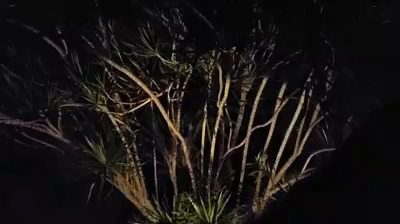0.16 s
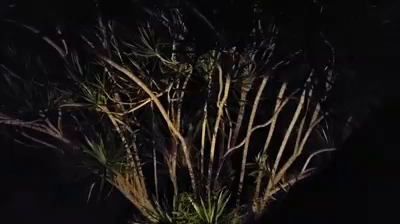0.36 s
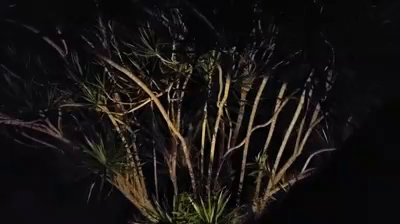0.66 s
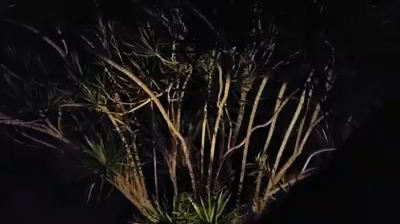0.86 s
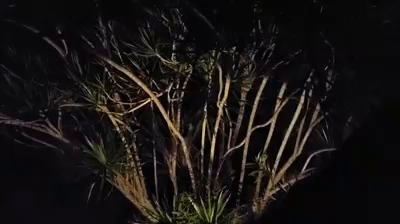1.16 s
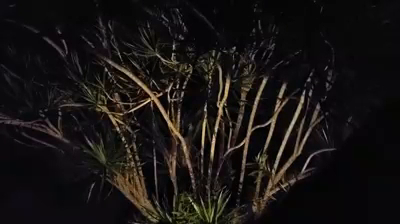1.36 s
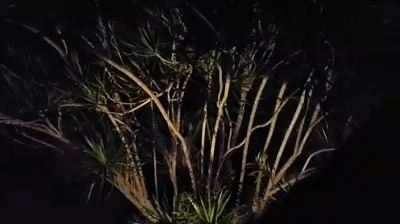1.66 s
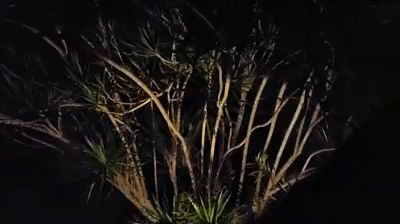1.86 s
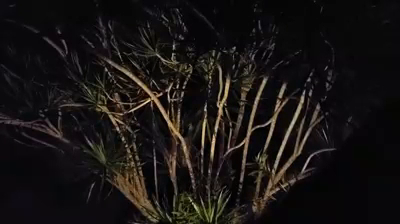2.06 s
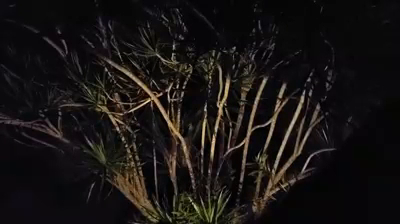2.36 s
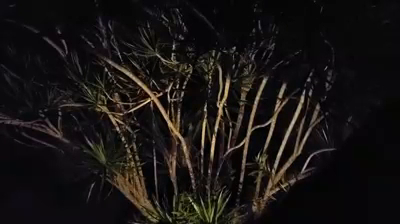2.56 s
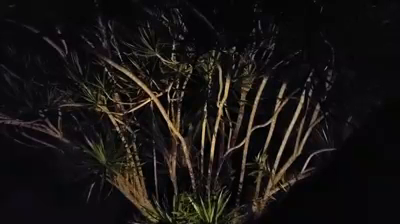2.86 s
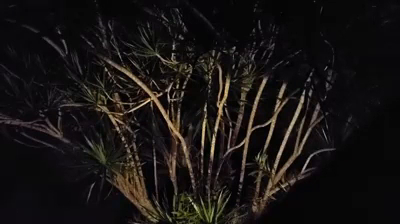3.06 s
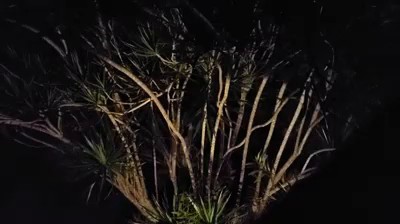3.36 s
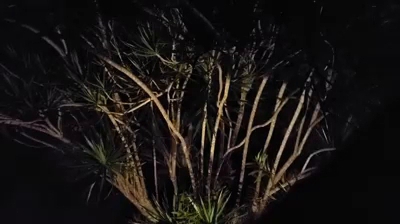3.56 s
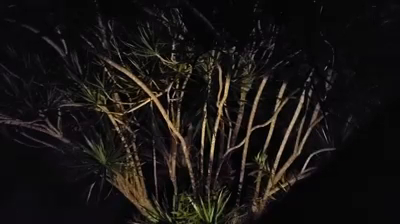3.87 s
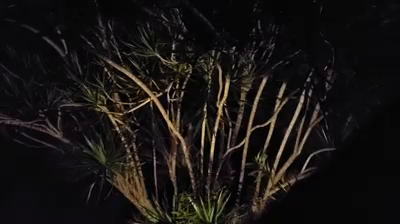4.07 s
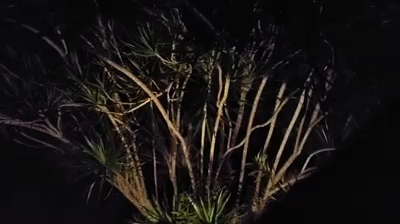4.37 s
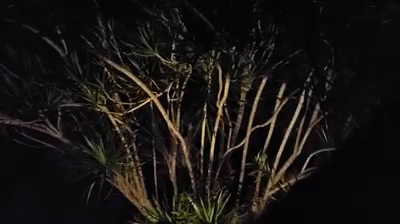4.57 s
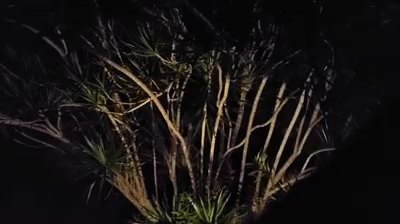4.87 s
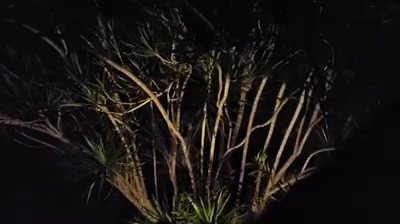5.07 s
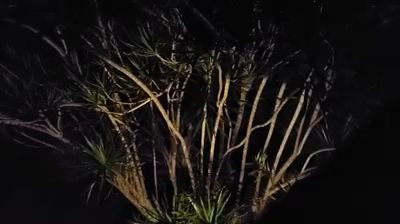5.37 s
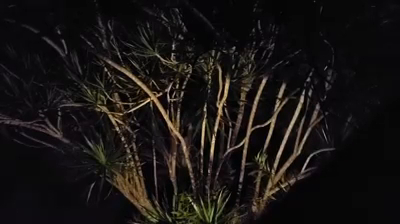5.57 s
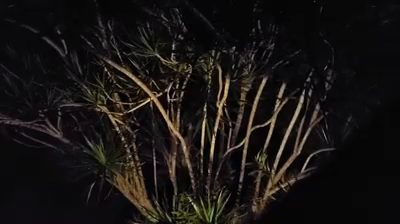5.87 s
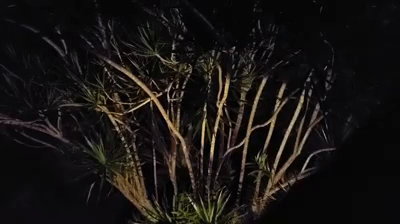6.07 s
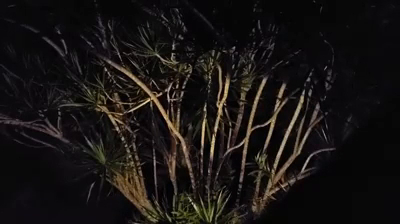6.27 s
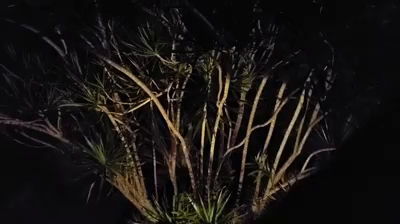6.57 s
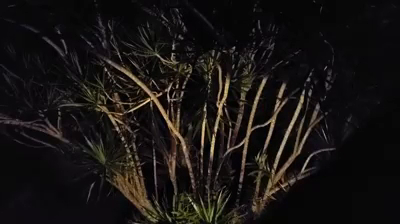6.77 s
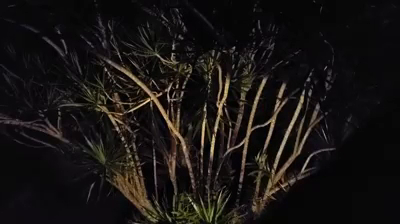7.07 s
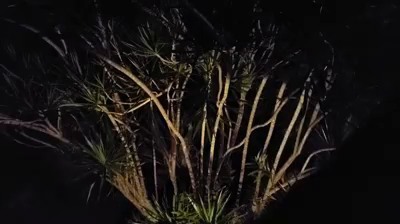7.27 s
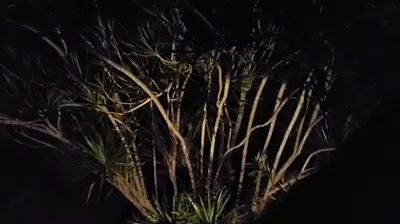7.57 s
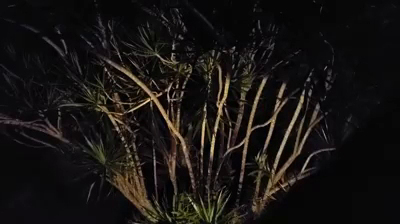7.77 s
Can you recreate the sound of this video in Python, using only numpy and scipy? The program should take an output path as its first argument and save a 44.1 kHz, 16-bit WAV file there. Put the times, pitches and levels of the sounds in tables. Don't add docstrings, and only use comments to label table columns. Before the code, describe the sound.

Crowded frog chorus outdoors among plants: short falling chirps, quick rising peeps and long thin whistles, over blurred insects, low air and a faint wavering machine hum. One close frog calls two-note phrases early, midway and late. A high katydid rasp ends before the middle, hollow toad trills pulse later, a cricket rings fast, and handling thumps knock the microphone. The frogs continue to the end.

```python
import sys
import numpy as np
from scipy import signal
from scipy.fft import rfft, irfft, next_fast_len
from scipy.io import wavfile
from scipy.ndimage import uniform_filter1d

SR = 44100
rng = np.random.default_rng(int(sys.argv[2]) if len(sys.argv) > 2 else 0)


def how_loud(loudness_db):
    steps = np.asarray(loudness_db, float) / 20
    return 10 ** steps


def log_audio(samples):
    frames = np.atleast_2d(samples).T
    limited = np.clip(frames, -1, 1)
    pcm = np.round(limited * 32767).astype(np.int16)
    wavfile.write(sys.argv[1], SR, pcm)


N = 349713
T = np.arange(N) / SR


def evened(x):
    return x / np.sqrt(np.mean(x ** 2) + 1e-20)


def read(points, hz):
    f, value = np.transpose(points)
    return np.interp(np.log(hz + 1), np.log(f + 1), value)


def panned(pan_db):
    return how_loud([[pan_db / 2], [-pan_db / 2]])


def add(mix, s, sound, pan_db):
    part = mix[:, max(round(s * SR), 0):][:, :len(sound)]
    part += sound[:part.shape[1]] * panned(pan_db)


def drift(count, hz):
    at = np.arange(0, count + 32, 32)
    rates = hz * rng.uniform(0.2024, 1, 6)
    slow = sum(np.sin(2 * np.pi * (rate * at / SR + rng.random())) for rate in rates)
    return np.interp(np.arange(count), at, slow) / np.sqrt(3)


def tone(hz):
    return np.sqrt(2) * np.sin(2 * np.pi * (np.cumsum(hz) / SR + rng.random()))


def foliage(x, t60):
    taps = np.zeros((2, SR))
    at = np.arange(200, SR - 40, 40) + rng.integers(0, 40, (2, (SR - 201) // 40))
    np.put_along_axis(taps, at, rng.choice([-1., 1.], at.shape), 1)
    taps *= how_loud(-60 * np.arange(SR) / SR / t60)
    taps /= np.linalg.norm(taps[0])
    size = next_fast_len(N + SR, real=True)
    return irfft(rfft(x, size) * rfft(taps, size), size)[:, :N]


# f/Hz, left-right likeness [0-1]
LIKENESS = [(60, 1), (700, 0.75), (1400, 0.084), (4000, 0.34), (9000, 0.055)]


def hiss(spectrum, patchy_db, pan_db):
    frames, hz = N // 256 + 5, np.fft.rfftfreq(1024, 1 / SR)
    a, b, c, d, patches = rng.standard_normal((frames, 513, 5)).T
    patches = uniform_filter1d(patches, size=6, axis=0)
    patches = evened(uniform_filter1d(patches, size=20, axis=1))
    same = np.clip(read(LIKENESS, hz), -1, 1)[:, None]
    left = a + 1j * b
    right = same * left + np.sqrt(1 - same ** 2) * (c + 1j * d)
    z = np.array([left, right]) * how_loud(read(spectrum, hz)[:, None] + patchy_db * patches)
    noise = signal.istft(z, nperseg=1024, noverlap=768)[1][:, :N]
    return evened(noise) * panned(pan_db)


# f/Hz, level/dB per Hz
AIR_SPECTRUM = [(20, -35), (40, -32), (75, -6.5), (300, -15.5), (750, -22), (1250, -24.5), (2800, -5.5),
                (3400, -20.5), (4500, -52)]


def night_air():
    return how_loud(-47.5) * hiss(AIR_SPECTRUM, patchy_db=0.5, pan_db=-2.5)


# f/Hz, level/dB per Hz
INSECT_SPECTRUM = [(3300, -36), (3800, -26), (4200, -7), (5370, -4.5), (6250, -8), (6650, -26), (7450, -17),
                   (7900, -32.5), (9600, -38.5), (11200, -31.5), (13600, -35.5), (14300, -44), (15900, -38)]


def distant_insects():
    return how_loud(-42.5) * hiss(INSECT_SPECTRUM, patchy_db=2.5, pan_db=-1.5)


# t/s, low order level/dB, middle order level/dB, low order f/Hz
MACHINE_HUM = [
    (0, -50, -52.5, 58),
    (.6, -75, -82, 58),
    (.85, -52, -71, 58),
    (1.5, -55.5, -64, 58),
    (1.8, -65.5, -71.5, 58),
    (3.4, -55.5, -64, 64),
    (4.2, -54, -90, 65),
    (4.6, -53, -55, 67),
    (7.9, -58.5, -68.5, 73),
]
# middle t/s, half length/s, level/dB
MACHINE_LOAD = [
    (3, 0.54, -63.5),
    (3.492, 0.074, -55.5),
    (3.82, 0.11, -59.5),
    (6.452, 0.49, -56.5),
]


def machinery():
    s, low_db, mid_db, low_hz = np.transpose(MACHINE_HUM)
    load = sum(how_loud(db) * np.exp(-((T - at) / half) ** 4) for at, half, db in MACHINE_LOAD)
    lines = [(np.interp(T, s, low_hz), how_loud(np.interp(T, s, low_db))),
             (118, how_loud(np.interp(T, s, mid_db))),
             (241, load)]
    hum = np.zeros(N)
    for hz, level in lines:
        waver = how_loud(2.2 * drift(N, hz=15.0))
        hum += level * waver * tone(hz * (1 + 0.0087 * drift(N, hz=9.0)))
    return hum * how_loud([[-3.1], [1.7]])


# t/s, length/s, level/dB, voice f/Hz, strongest throat f/Hz
DOG_YAPS = [
    (3.179, 0.027, -44, 100.5, 570),
    (5.077, 0.017, -44, 100.4, 1056),
    (5.155, 0.043, -44, 114.4, 1106),
    (5.329, 0.085, -39, 99.8, 582),
]


def dog():
    out = np.zeros((2, N))
    for s, length, db, voice_hz, throat_hz in DOG_YAPS:
        t = np.linspace(0, 1, round(length * SR))
        voice = np.zeros(len(t))
        for k in range(3, 13):
            throat = 1 / (1 + ((k * voice_hz - throat_hz) / 55) ** 4)
            voice += throat * tone(k * voice_hz * (1 + 0.02 * np.sin(np.pi * t)))
        add(out, s, how_loud(db) * evened(voice) * np.hanning(len(t)), -1.5)
    middle, side = foliage(out, t60=0.39)
    return out + how_loud(3.0) * (middle + .35 * side * [[1], [-1]])


# t/s, level/dB, f/Hz
TOAD_TRILLS = [
    [(.05, -63, 517), (1.4, -64.5, 487.6)],
    [(2.88, -62, 431), (3.5, -55, 493.7), (4.2, -48, 512), (4.6, -48, 521.6), (5.1, -54, 546),
     (5.8, -57, 518)],
    [(4.3, -52.5, 577), (4.65, -47, 629), (5, -50, 636.5), (5.4, -54, 663), (5.8, -54, 635),
     (6.25, -52, 594), (6.65, -68, 555)],
]
# t/s, beats so far
TOAD_BEATS = [
    [(.07, 0), (1.403, 21)],
    [(2.927, 0), (4.565, 23), (5.85, 41)],
    [(4.333, 0), (5.484, 16), (6.246, 27), (6.66, 33)],
]


def toads():
    out = np.zeros((2, N))
    for trill, beats in zip(TOAD_TRILLS, TOAD_BEATS):
        s, db, hz = np.transpose(trill)
        t = np.arange(s[0], s[-1], 1 / SR)
        beat = np.interp(t, *np.transpose(beats)) % 1
        gate = np.exp(-((beat - .2) / 0.2) ** 2) + 0.58 * np.exp(-((beat - .68) / 0.11) ** 2)
        voice = tone(np.interp(t, s, hz) * (1 + 0.023 * drift(len(t), hz=30.3)))
        voice = voice + 0.1 * voice ** 2
        level = how_loud(np.interp(t, s, db) + 2.8 * drift(len(t), hz=24.95))
        add(out, s[0], level * evened(gate) * voice * signal.windows.tukey(len(t), .08), -1.5)
    return out + how_loud(-12) * foliage(out, t60=.4)


# f/Hz, level/dB per Hz
KATYDID_SPECTRUM = [(4530, -44), (7700, -49), (7910, -42), (8250, -1.5), (11300, 18), (14200, 15.5),
                    (15100, 20.5), (15800, -1)]
# t/s, level/dB
KATYDID_LEVEL = [
    (0, -50.5),
    (1.88, -50),
    (1.92, -57),
    (3.54, -57.5),
    (3.57, -76),
]


def katydid():
    throb_hz = 11.2 + .3 * drift(N, hz=1.5)
    throb = 1 + .15 * np.sin(2 * np.pi * np.cumsum(throb_hz) / SR)
    level = how_loud(np.interp(T, *np.transpose(KATYDID_LEVEL)))
    return level * throb * hiss(KATYDID_SPECTRUM, patchy_db=.6, pan_db=2.5)


# t/s, level/dB, rhythm (x a stroke, . a rest)
CRICKET_PHRASES = [
    (.739, -49, "xx"),
    (1.543, -42, "x..x..xx.xx..xxx.xxxx..x..xx"),
    (3.092, -42, "x..xx.xx...x....xx..xxxxxx.xx..x.xxx..x"),
    (4.326, -42.5, "xxx..xx..xx..xxxxxx.x"),
    (5.033, -41.5, "xx..x.xx.xxxx.....x..x"),
    (5.795, -40, "xx..xxxx.xxxxxxxx"),
    (6.476, -39.5, "x..xxx..xx..xxxx..xxxxxxxxxxx"),
]


def cricket():
    strokes_per_s = 38.3
    out, t = np.zeros((2, N)), np.linspace(0, 1, round(.022 * SR))
    for s, db, rhythm in CRICKET_PHRASES:
        for k, beat in enumerate(rhythm):
            if beat == "x":
                stroke = np.hanning(len(t)) * tone(5540 - 240 * t)
                level = how_loud(db - 0.1 + rng.standard_normal())
                add(out, s + k / strokes_per_s - .011, level * stroke, -5.5)
    return out + how_loud(-6) * foliage(out, t60=.15)


# t/s, peak level/dB, ring f/Hz, t60/s
HOUSING_BUMPS = [
    (.006, -24.5, 236, 0.011),
    (0.2304, -19.5, 272, 0.018),
    (.229, -42, 1060, .015),
    (2.165, -45, 670, 0.033),
    (3.453, -31, 111, 0.06),
    (3.548, -37.5, 89.7, 0.095),
    (3.923, -25, 101.4, 0.055),
    (6.583, -37.5, 89.3, 0.062),
]


def bumps():
    out, t = np.zeros((2, N)), np.arange(0, .08, 1 / SR)
    for s, db, hz, t60 in HOUSING_BUMPS:
        ring = np.sin(2 * np.pi * hz * t * (1 - 1.9 * t)) * np.clip(t * hz * 1.6, 0, 1)
        add(out, s, -how_loud(db + 6.0 - 60 * t / t60) * ring, -3)
    return out


WHISTLE_VOICES = [
    ((3665, 3785, 3, 5), [(.5, .41, -41), (2.49, .41, -41.5), (4.57, .43, -42.5), (7.03, .41, -43)]),
    ((4428, 4400, -7, 0), [(1.96, .3, -41.5), (4.02, .3, -41), (6.19, .31, -41)]),
    ((3960, 3960, 3, 0), [(.57, .32, -38.7), (2.51, .44, -45.9), (5.28, .32, -52.8), (5.96, .08, -43.6), (0, .2, -55), (.93, .28, -55), (7.13, .32, -44.4)]),
    ((3945, 3885, 6, 0), [(.28, .27, -50.4), (3.31, .39, -41.5), (4.85, .37, -50.9), (6.06, .27, -41.4)]),
    ((3449, 3389, 3, 0), [(2.5, .7, -56.6)]),
    ((3700, 3800, 0, 0), [(0, .22, -56), (.93, .27, -51), (2.9, .3, -55), (5.7, .25, -57)]),
]


def whistlers():
    out = np.zeros((2, N))
    far = []
    for s, u, v in rng.random((70, 3)):
        hz = 3830 + 1100 * v ** 2
        far.append(((hz, hz + 10, -2, 0), [(s * N / SR, .3, -55 - 6 * u)]))
    for (hz0, hz1, pan_db, swell_db), tones in WHISTLE_VOICES + far:
        for s, length, db in tones:
            t = np.linspace(0, 1, round(length * SR))
            breath = np.clip(np.minimum(t / .3, (1 - t) * length / .035), 0, 1)
            level = how_loud(db + swell_db * (2 * t - 1) + 2.6 * drift(len(t), hz=18))
            hz = hz0 + (hz1 - hz0) * t + 30 * np.sin(np.pi * t) - 70 * t ** 10
            hz = hz + 6 * drift(len(t), hz=13.84)
            add(out, s, breath * level * tone(hz - 15), pan_db)
    return out + how_loud(-12.5) * foliage(out, t60=0.78)


def note(db, hz0, hz1, length, bend, rise, fall):
    haste = max(hz0 / 2650, .9 if hz1 > 1.1 * hz0 else 1) ** 3
    swell_db = max(db + 37, 0) * (hz1 > hz0)
    span = length * (1.4359 + swell_db / 20) / haste
    t = np.arange(0, span, 1 / SR)
    hz = hz1 + (hz0 - hz1) * np.exp(-t * haste / (1.2 * bend))
    hz = hz * (1 + 0.0071 * drift(len(t), hz=48.5))
    shape = np.clip(t / rise, 0, 1) * np.clip((1 - t / span) * length / fall, 0, 1)
    level = how_loud(db - 0.85 * swell_db * np.exp(-(t / 0.023) ** 2) + 2.7 * drift(len(t), hz=61.3))
    return level * shape * tone(hz)


# t/s, low note level/dB, whistle level/dB
NEAR_FROG = [
    (0.369, -34, -25),
    (3.753, -33, -24.5),
    (6.186, -33, -25),
]
# start f/Hz, goal f/Hz, left-right/dB
NEAR_LOW_NOTE = (1628, 1532, -2.7)
NEAR_WHISTLE = (2516, 3015, 5)
LOW_FROGS = [
    ((1605, 1535, -7.5), [(1.086, -53), (1.756, -47), (2.51, -44), (3.983, -52.5), (4.961, -44.5), (6.805, -51.5), (6.936, -55), (7.303, -46)]),
    ((1480, 1400, -19.5), [(0, -52), (1.74, -47), (2.2, -61), (4.55, -54.5), (6.625, -43)]),
]
SHORT_NOTE_FROGS = [
    ((2010, 1850, -7), [(.411, -42.5), (.938, -38), (1.22, -44.5), (1.824, -37.5), (2.842, -38), (3.652, -36.5), (5.691, -42.5), (6.246, -40), (7.008, -39), (7.311, -38.5), (7.858, -37)]),
    ((1935, 1750, -12.5), [(1.101, -46.5), (2.562, -43), (3.225, -42), (3.879, -40), (5.076, -43.5), (5.791, -47), (6.545, -41)]),
    ((2050, 1825, -11.5), [(.539, -43), (2.666, -46), (3.336, -42), (5.376, -42)]),
                    ((1950, 1980, -12), [(1.824, -44), (1.95, -43.5), (4.03, -48), (4.2, -47), (4.534, -38), (4.653, -51.5), (6.378, -43.5)]),
    ((2110, 2080, -16.5), [(2.658, -45), (3.56, -48), (5.228, -49), (5.843, -49)]),
]
RISING_FROGS = [
    ((2230, 2700, -5), [(.22, -42.5), (2.502, -42), (4.753, -41), (7.224, -40.5)]),
    ((2520, 2980, -2.4), [(1.305, -37), (2.694, -43), (2.758, -33.5), (3.584, -39.5), (4.669, -35.5), (5.204, -33.5), (5.46, -49), (5.791, -40), (6.896, -37), (7.176, -37), (7.539, -34)]),
    ((2615, 3080, -2.5), [(.479, -38.5), (1.169, -38), (1.7, -45), (1.888, -37.5), (1.999, -33.5), (3.241, -43)]),
                ((2725, 3160, -1), [(1.01, -42.5), (2.646, -38.5), (3.396, -37.5), (5.755, -39.5), (6.298, -41), (7.088, -41), (7.403, -35.5)]),
    ((2840, 3020, -1.8), [(.591, -34), (1.277, -37), (2.897, -39), (3.971, -35.5), (4.127, -37), (4.661, -37.5), (5.168, -38.5), (6.633, -36)]),
    ((3000, 3475, 0), [(.583, -37), (1.401, -36.5), (2.291, -36), (3.041, -36.5), (3.72, -34.5), (4.602, -33), (5.276, -37), (5.891, -35.5), (6.6, -35.5), (7.26, -34.5), (7.85, -36)]),
]
# length/s, bend/s, rise/s, fall/s, echo level/dB
NOTE_SHAPES = [
    (0.085, 0.038, 0.0044, 0.063, -1),
    (0.035, 0.026, 0.0032, 0.026, -1.5),
    (.075, .036, 0.00067, 0.051, 0.5),
]
# level/dB, lowest f/Hz, glide ratio
FAR_CROWD = [
    (-58, 1430, .96),
    (-54.5, 2000, 1.4),
    (-49.5, 2450, 1.14),
]


def tree_frogs():
    straight, thickets = np.zeros((2, N)), np.zeros((4, 2, N))
    low, short, rising = [[(s, db, *voice) for voice, notes in voices for s, db in notes]
                          for voices in (LOW_FROGS, SHORT_NOTE_FROGS, RISING_FROGS)]
    low_hz0, low_hz1, _ = NEAR_LOW_NOTE
    for s, low_db, rise_db in NEAR_FROG:
        low.append((s, low_db, *NEAR_LOW_NOTE))
        low.append((s, low_db - 3.5, 2 * low_hz0, 2 * low_hz1, 2))
        rising.append((s + .233, rise_db, *NEAR_WHISTLE))
    far = rng.random((390, 4))
    for k, (rows, (far_db, lowest_hz, glide)) in enumerate(zip((low, short, rising), FAR_CROWD)):
        crowd = []
        for s, u, v, w in far[k::3]:
            hz = lowest_hz * (1 + v / 4)
            crowd.append((.2 + s * (N / SR - .21), far_db - 7 * u, hz, hz * glide, 8 * w - 5))
        *shape, echo_db = NOTE_SHAPES[k]
        for i, (s, db, hz0, hz1, pan_db) in enumerate(rows + crowd):
            sound = note(db, hz0, hz1, *shape)
            add(straight, s - .002, sound * how_loud(.4 * (db + 28)), pan_db)
            add(thickets[i % 4], s - .002, sound * how_loud(echo_db - .3 * (db + 42)), .6 * pan_db)
    return straight + how_loud(1.0) * sum(foliage(x, t60=0.5) for x in thickets)


def scene():
    background = night_air() + distant_insects() + machinery() + dog()
    singers = toads() + katydid() + cricket() + whistlers() + tree_frogs()
    return background + bumps() + singers


def top_cut(x):
    return signal.sosfilt(signal.butter(12, 15920, fs=SR, output="sos"), x)


# f/Hz, level/dB under the neighbourhood
MASKING = [(1300, -40), (1750, -14), (2000, -24), (2250, -17), (2600, -28), (3600, -15), (6700, -10),
           (9000, -3.5), (11000, -7)]
# f/Hz, level/dB per bin
HEARING_FLOOR = [(7000, -125), (8000, -99), (11000, -102), (13500, -101), (15000, -96)]


def record(dry):
    hz, _, z = signal.stft(dry, SR, nperseg=2048, noverlap=1536)
    power = uniform_filter1d((abs(z) ** 2).mean(0), size=5, axis=1)
    masked = uniform_filter1d(power, size=70, axis=0) * how_loud(2 * read(MASKING, hz))[:, None]
    floor = how_loud(2 * read(HEARING_FLOOR, hz))[:, None]
    heard = uniform_filter1d(power, size=3, axis=0) > masked + floor
    mix = signal.istft(z * heard, SR, nperseg=2048, noverlap=1536)[1][:, :N]
    return top_cut(mix)


dry = scene()
out = record(dry)
log_audio(out)
```